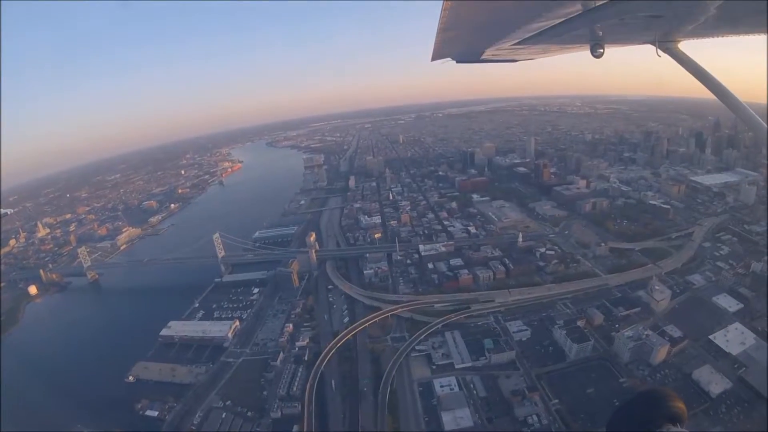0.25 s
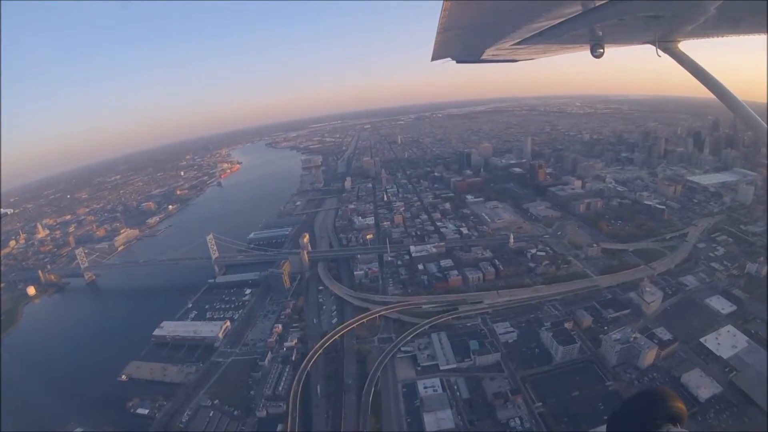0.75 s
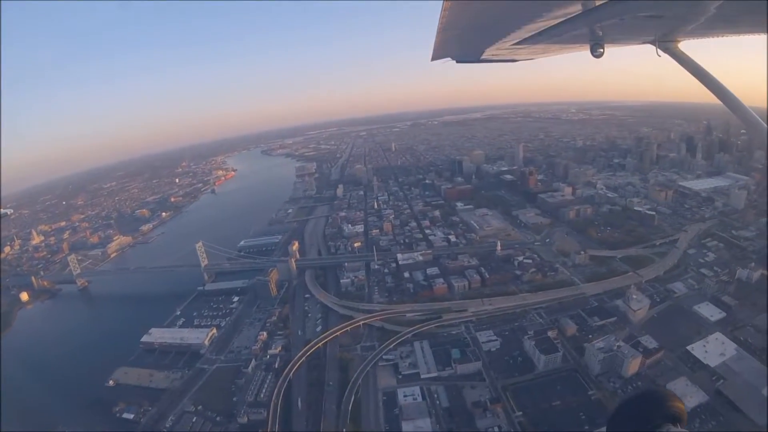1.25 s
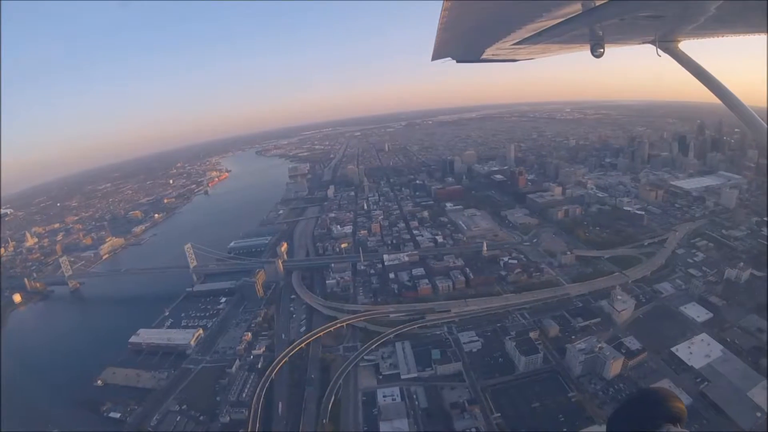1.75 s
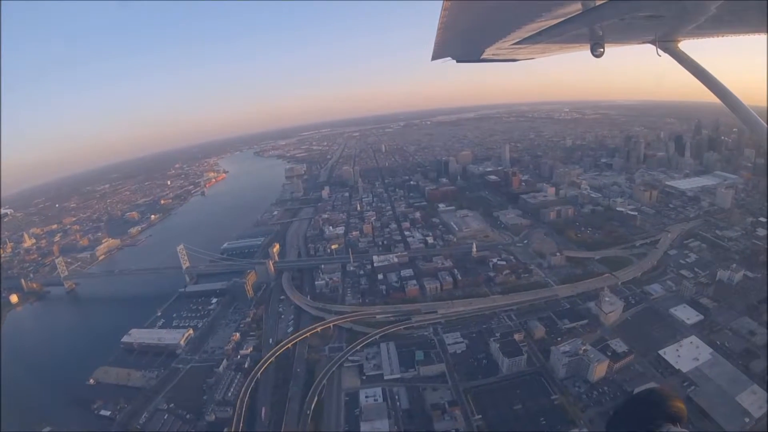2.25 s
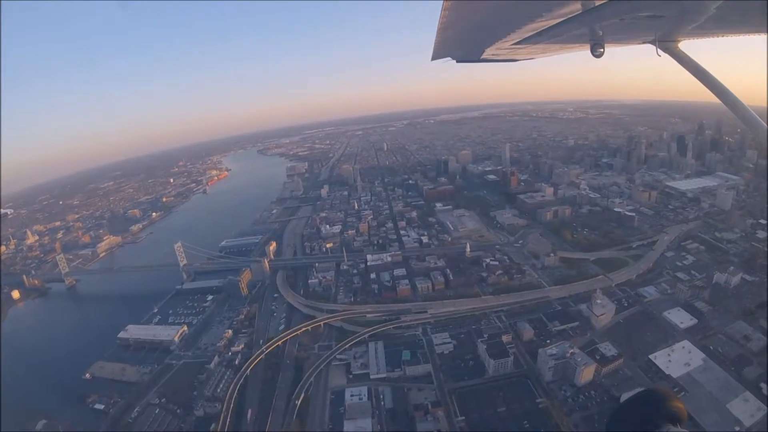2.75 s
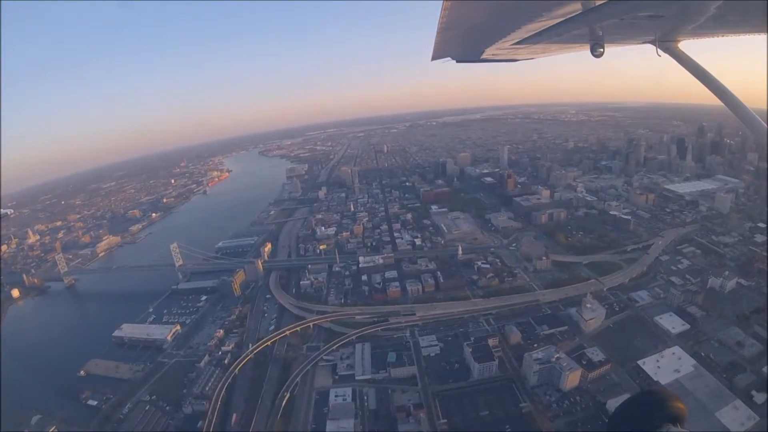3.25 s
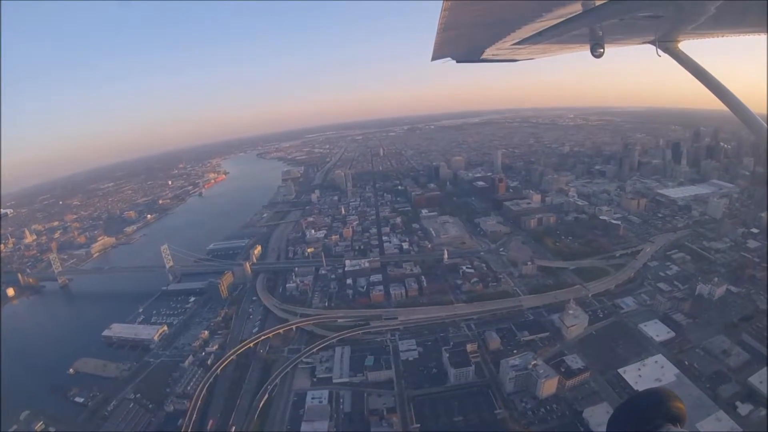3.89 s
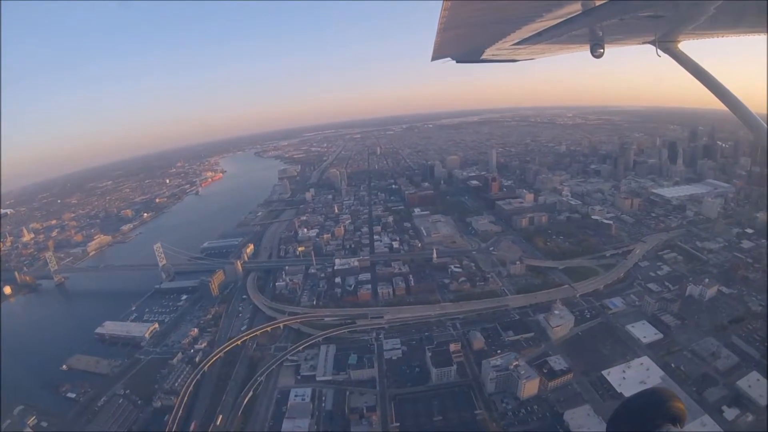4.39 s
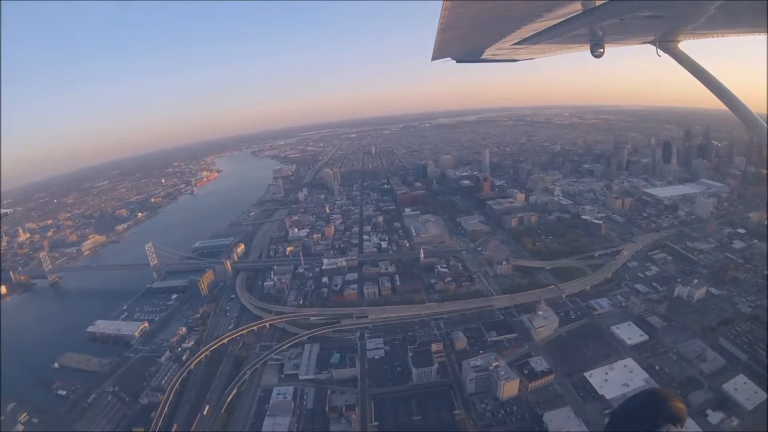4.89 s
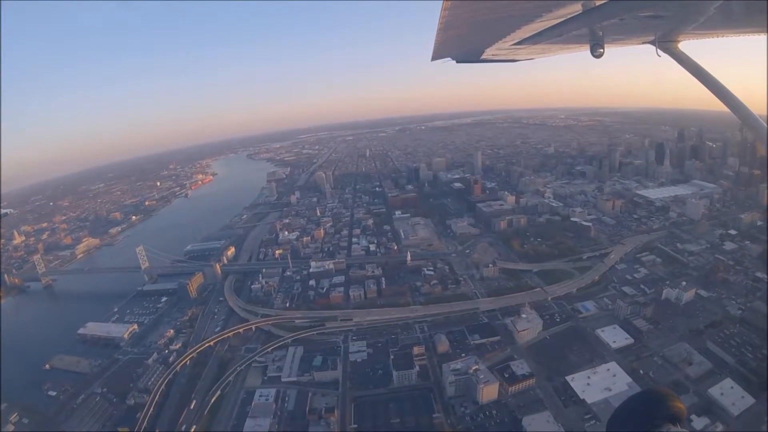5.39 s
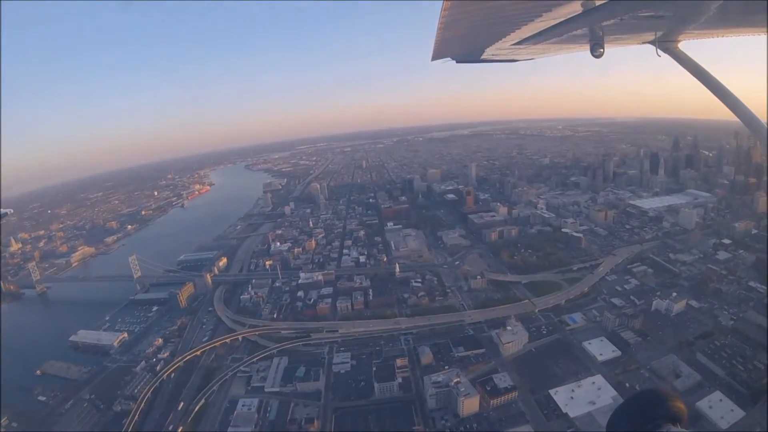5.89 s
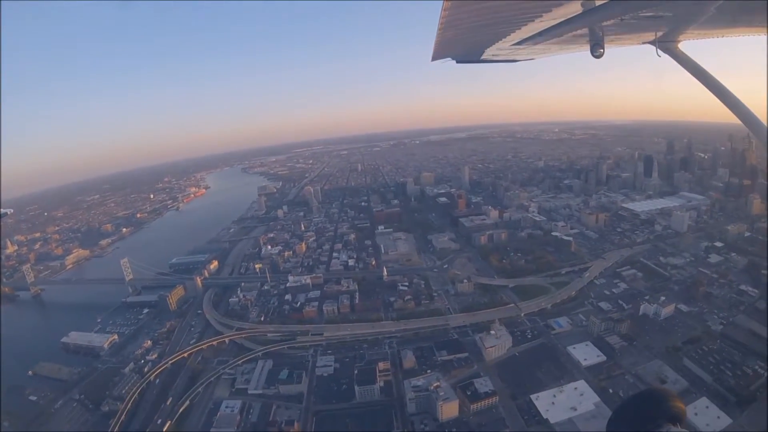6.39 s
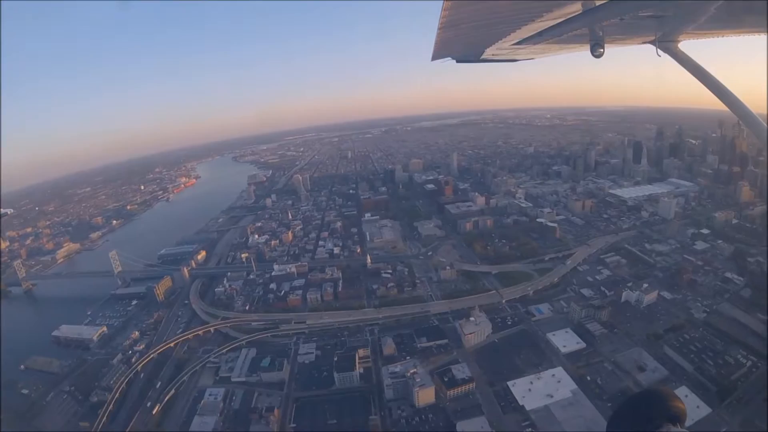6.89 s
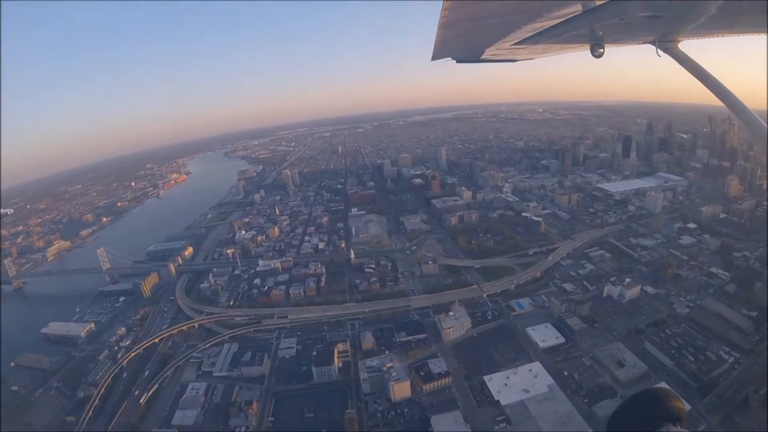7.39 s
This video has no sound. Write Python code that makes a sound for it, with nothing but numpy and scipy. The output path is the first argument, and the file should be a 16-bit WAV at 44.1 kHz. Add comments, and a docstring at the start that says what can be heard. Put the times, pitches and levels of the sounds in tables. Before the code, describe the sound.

A single-engine propeller plane cruises in level flight, heard from inside its cabin. The sound fades in over the first four seconds or so, then holds: a strong low engine hum at a steady pitch, with a deep airframe rumble and a softer hiss of air. The propeller tone swells slightly early on and again near the end, and a faint vent whistle comes in gusts during the second half.

```python
"""The cabin of a light plane in level flight fades in over the first 4.4 seconds.
From the start a six-cylinder four-stroke engine hums, turning a two-blade propeller near 2280 rpm,
while the slipstream rumbles on the airframe and hisses at the door seals, pulsing a little.
The blade tone swells near 2 s. Between 4 and 5 s a pane briefly rings louder
and a vent begins to whistle louder in gusts. Near the end the blade tone swells again."""
import sys
import numpy as np
from scipy import signal
from scipy.fft import rfft, irfft, next_fast_len
from scipy.io import wavfile
from scipy.ndimage import uniform_filter1d, map_coordinates

SR = 44100
rng = np.random.default_rng(int(sys.argv[2]) if len(sys.argv) > 2 else 0)


def waveform_to_disk(signal):
    """Save audio, clipped to [-1, 1], as 16-bit WAV at the path in sys.argv[1]."""
    frames = np.transpose(np.atleast_2d(signal))
    scaled = np.clip(frames, -1, 1) * 32767
    samples = np.round(scaled).astype(np.int16)
    wavfile.write(sys.argv[1], SR, samples)


N = 337365

# crankshaft speed: (time [s], speed [rpm])
CRANK_SPEED = [(0, 2275), (.9, 2281), (1.55, 2268), (2.1, 2275), (2.85, 2280), (3.55, 2275), (4.3, 2289),
               (5.08, 2267), (5.65, 2281), (6.4, 2277), (6.9, 2272), (7.65, 2273)]
# firing tone and neighbours: (cycle harmonic [1], level [dB], load response [dB/dB], waver [0-1])
FIRING_TONES = [(6, -13, 0, 0.05), (12, -35, -0.67, .25), (14, -36.5, 0.44, .2)]
# exhaust and engine mounts: (cycle harmonic [1], level [dB])
ENGINE_OVERTONES = [(2, -33.5), (7, -33.5), (10, -35), (15, -33.5), (18, -42.5), (21, -47.5), (25, -47.5),
                    (26, -48.5), (27, -52), (28, -47.5), (29, -50), (31, -47), (32, -47), (35, -54.5),
                    (36, -50), (39, -49), (40, -54.5), (42, -54)]
# exhaust tone: (time [s], swell [dB])
EXHAUST_SWELL = [(0, 1.5), (2.2, -1.5), (3.4, -1.5), (4.4, -3.5), (5.2, 3), (5.9, 0), (6.7, -1.5),
                 (7.65, 0)]
# propeller load in uneven air: (time [s], blade tone swell [dB])
BLADE_LOAD = [(0, 1), (.5, -1.5), (1.1, -4.5), (1.6, 6.5), (2.15, 12), (3.1, 2), (3.9, 5), (4.9, -5.5),
              (5.6, -6), (6.05, -10), (6.8, -1.5), (7.35, 9), (7.65, 6.5)]
# tip rasp: (blade harmonic [1], early level [dB], late level [dB], load response [dB/dB])
BLADE_OVERTONES = [(2, -27, -24.7, -0.15), (4, -32.5, -34, 0.39), (5, -34, -40.5, -0.2),
                   (6, -39.5, -42.5, 0.39)]
# airframe rumble: (frequency [Hz], relative density [dB])
RUMBLE_SPECTRUM = [(4, -46), (12, -25.5), (28, -16.5), (39, -1.3), (52, -1.2), (72, 1.5), (110, -2),
                   (185, -3), (270, -8.5), (360, -12.5), (450, -17), (700, -27), (1500, -44.5), (4000, -90)]
# airframe rumble: (time [s], swell [dB])
RUMBLE_SWELL = [(0, -0.3), (2.2, -1), (3.4, -1), (4.7, 0.9), (6.5, 0.3), (7.65, -1)]
# the rumble's band near 335 Hz, uneven, briefly louder near 4.2 and 5 s: (time [s], level [dB])
RUMBLE_BAND_LEVEL = [(0, -38), (.6, -34), (1.6, -37), (3.6, -40), (4.2, -32), (4.6, -35), (5.05, -27),
                     (5.6, -40), (7.65, -42)]
# slipstream hiss: (frequency [Hz], relative density [dB])
HISS_SPECTRUM = [(100, -14.5), (500, 2), (1200, -1), (2000, -8), (3000, -12.5), (4000, -15), (5400, -18.5),
                 (7200, -23.5), (8200, -32), (9800, -42), (11300, -40), (12000, -51), (13300, -57),
                 (15000, -72)]
# slipstream hiss: (time [s], swell [dB])
HISS_SWELL = [(0, 0), (.5, 0.8), (1.2, -0.2), (1.8, -0.75), (3.1, -1.2), (4, 0), (4.6, 0.6), (5, 0),
              (6.3, .5), (7.65, -0.5)]
# windows and door gaps: (frequency [Hz], width [Hz], early lift [dB], late lift [dB])
GAP_RESONANCES = [(870, 110, -1, -3), (1007, 190, 4, 3), (1305, 40, 1, 3), (1377, 70, -2.5, -3),
                  (1600, 260, 3, 2.5), (2384, 330, 3, 4.5), (2920, 55, 6, 2.5), (3050, 120, 4, 6),
                  (3290, 150, 3.5, 1.5), (3440, 45, 8.5, 4), (3500, 35, -2.5, -3), (4070, 60, 3.5, 3),
                  (4720, 380, 2.5, 2.5), (5300, 250, 2, 2), (6470, 210, 6, 7)]
# window pane: (frequency [Hz], width [Hz], level [dB])
PANE_MODES = [(954, 16, -43), (1001, 30, -47.5), (1061, 25, -45.5)]
# ring of the pane: (time [s], swell [dB])
RING_SWELL = [(0, -0.5), (1.8, -2.5), (3.2, -1), (4.3, -1), (4.65, 4.5), (5, .5), (6.4, -0.5), (7.65, -0.5)]
# vent whistle: (frequency [Hz], width [Hz], level [dB])
VENT_PITCHES = [(3272, 32, -54), (3330, 25, -59), (3585, 30, -62.5)]
# draught through the vent: (time [s], whistle swell [dB])
VENT_SWELL = [(0, 0), (3.8, -2), (4.2, 0), (4.45, 8), (4.85, 1.5), (5.35, 9.5), (6.1, 2), (6.5, 5.5),
              (7.1, 1), (7.65, 7)]

TIME = np.arange(N) / SR
SHIFT_S = (2.7, 4.9)  # the airflow changes: hiss and rasp pass from early to late colour


def engine(cycle, exhaust_db=-23, uneven=0.036):
    """Periodic firing, six times a cycle, makes the hum; unequal cylinders add other harmonics."""
    load_db = curve(BLADE_LOAD)
    hum = sum(amp(db + response * load_db) * tone(k * cycle, waver, rate=4)
              for k, db, response, waver in FIRING_TONES)
    overtones = sum(amp(db) * tone(k * cycle, waver=.25, rate=2.05) for k, db in ENGINE_OVERTONES)
    exhaust = amp(exhaust_db + curve(EXHAUST_SWELL)) * tone(9 * cycle, waver=.05, rate=4)
    combustion = 1 + uneven * wobble(30)  # no two cycles burn alike
    return (hum + exhaust + overtones) * combustion


def propeller(blade, level_db=-30):
    """Blade loading radiates harmonics of the passage rate, varying with the airflow into the disc."""
    load_db = curve(BLADE_LOAD)
    passage = amp(level_db + load_db) * tone(blade, waver=.08, rate=2.7)
    rasp = 0
    for k, early_db, late_db, response in BLADE_OVERTONES:
        db = np.interp(TIME, SHIFT_S, [early_db, late_db]) + response * load_db
        rasp += amp(db) * tone(k * blade, waver=.17, rate=2.007)
    return passage + rasp


def airframe(blade, rumble_db=-18.5, band_hz=334.7):
    """Forced vibration: turbulent propeller wash shakes the skin, a little harder at each blade."""
    shake = amp(rumble_db + curve(RUMBLE_SWELL) + 0.28 * wobble(7.1))
    rumble = shake * noise(lambda hz: spectrum(RUMBLE_SPECTRUM, hz))
    band = amp(curve(RUMBLE_BAND_LEVEL)) * narrowband(np.full(N, band_hz), width_hz=60)
    pulsing = 1 + 0.1 * np.cos(blade)
    return pulsing * (rumble + band)


def slipstream(blade, bank, level_db=-30.5):
    """Flow noise at the seals is amplitude-modulated by the blades and the nearer bank's exhaust."""
    early = gap_noise([(hz, width, db) for hz, width, db, _ in GAP_RESONANCES])
    late = gap_noise([(hz, width, db) for hz, width, _, db in GAP_RESONANCES])
    shift = np.interp(TIME, SHIFT_S, [0, np.pi / 2])  # equal-power crossfade
    hiss = eddies(np.cos(shift) * early + np.sin(shift) * late)
    pulsing = 1 + 0.015 * np.cos(blade) + 0.035 * np.cos(bank) + 0.022 * np.cos(2 * bank)
    return amp(level_db + curve(HISS_SWELL) + 0.15 * wobble(4.7)) * pulsing * hiss


def gap_noise(resonances):
    """Resonance in the gaps puts bell-shaped peaks and dips into the spectrum of the hiss."""
    def colour(hz):
        lift_db = sum(db / (1 + (2 * (hz - centre) / width) ** 2) for centre, width, db in resonances)
        return spectrum(HISS_SPECTRUM, hz) + lift_db
    return noise(colour)


def eddies(hiss, depth_db=1.2):
    """Turbulence: passing eddies briefly lift and lower narrow patches of the spectrum."""
    spectra = signal.stft(hiss, nperseg=1024)[2]
    patches = uniform_filter1d(rng.standard_normal(spectra.shape), 3, axis=0)  # across frequency
    patches = uniform_filter1d(patches, 14, axis=1)  # across time
    spectra = spectra * amp(depth_db * unit(patches))
    return unit(signal.istft(spectra, nperseg=1024)[1][:N])


def window(wander_hz=4):
    """The slipstream excites a pane's normal modes, whose pitch strays as air pressure flexes it."""
    flex = wobble(3)
    ring = sum(amp(db) * narrowband(hz + wander_hz * flex, width) for hz, width, db in PANE_MODES)
    return amp(curve(RING_SWELL)) * ring


def vent(wander_hz=8, flutter_db=1.5):
    """Flow through a narrow leak sustains a breathy, fluttering whistle that grows with the draught."""
    flutter = wobble(7)
    whistle = sum(amp(db) * narrowband(hz + wander_hz * flutter, width) for hz, width, db in VENT_PITCHES)
    return amp(curve(VENT_SWELL) + flutter_db * flutter) * whistle


def tone(phase, waver, rate):
    """Random modulation: unsteady air disturbs the amplitude and phase of a tone of rms 1."""
    phase = phase + 2 * np.pi * rng.random()
    return unit((1 + waver * wobble(rate)) * np.cos(phase) + waver * wobble(rate) * np.sin(phase))


def narrowband(centre_hz, width_hz):
    """Quadrature modulation moves low-pass noise up to a centre pitch: a breathy tone of rms 1."""
    band = lambda hz: -20 * np.log10(1 + (hz / width_hz) ** 2)
    phase = 2 * np.pi * np.cumsum(centre_hz) / SR
    return unit(noise(band) * np.cos(phase) + noise(band) * np.sin(phase))


def noise(colour):
    """Spectral shaping: white noise weighted by colour(hz) in dB, scaled to rms 1."""
    size = next_fast_len(N + SR // 2)
    white = rfft(rng.standard_normal(N), size)
    gain = amp(colour(np.fft.rfftfreq(size, 1 / SR)))
    return unit(irfft(white * gain, size)[:N])


def wobble(rate):
    """Slow fluctuation: a spline through rate random knots a second."""
    coarse = np.arange(0, N + 64, 64)
    knots = rng.standard_normal(1024)
    spline = map_coordinates(knots, [coarse * rate / SR], mode="wrap")
    return np.interp(np.arange(N), coarse, spline)


def spectrum(points, hz):
    """Interpolation of levels on a logarithmic frequency axis."""
    frequencies, levels = np.transpose(points)
    return np.interp(np.log(hz + 1), np.log(frequencies + 1), levels)


def curve(points):
    """Linear interpolation of a time table at every sample."""
    return np.interp(TIME, *np.transpose(points))


def amp(db):
    """Decibels to amplitude ratio."""
    return 10 ** (np.asarray(db) / 20)


def unit(x):
    """Normalisation to rms 1."""
    return x / np.sqrt(np.mean(x ** 2) + 1e-20)


def scene():
    """The sources superpose; engine, propeller and air pulses are phase-locked to the crankshaft."""
    cycle = np.pi * np.cumsum(curve(CRANK_SPEED) / 60) / SR  # phase [rad]; one cycle is two turns
    blade, bank = 4 * cycle, 3 * cycle  # four blade passages, three firings per cylinder bank
    cabin = engine(cycle) + propeller(blade) + airframe(blade) + slipstream(blade, bank)
    return (cabin + vent() + window())[None]


def record(dry, fade_s=4.42, fade_from_db=-23.5, cutoff_hz=15700):
    """A linear gain ramp fades the sound in; a steep low-pass filter limits its bandwidth."""
    fade = np.interp(TIME, [0, fade_s], [amp(fade_from_db), 1])
    low_pass = signal.butter(16, cutoff_hz, fs=SR, output="sos")
    return signal.sosfilt(low_pass, dry * fade)


dry = scene()
out = record(dry)
waveform_to_disk(out)
```